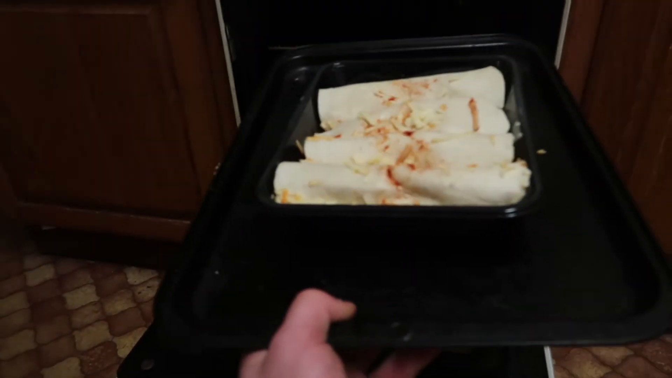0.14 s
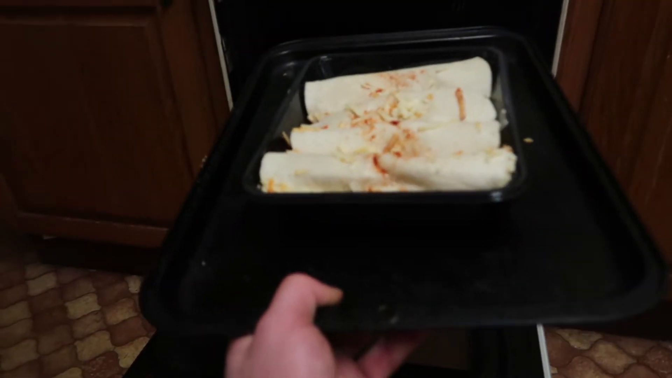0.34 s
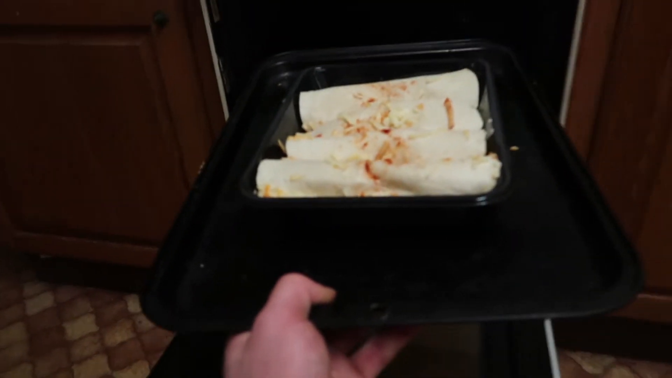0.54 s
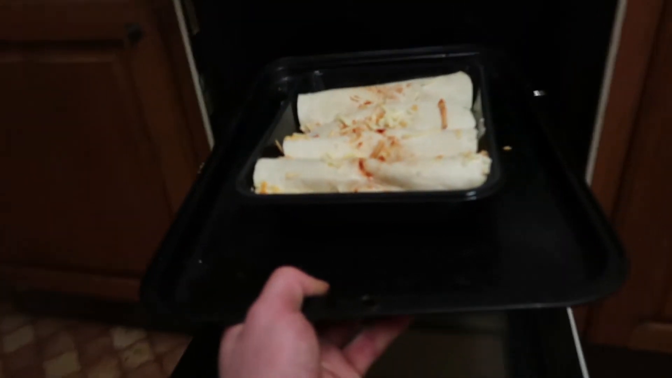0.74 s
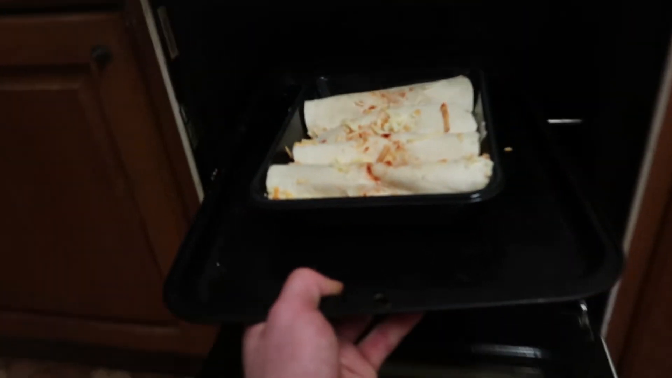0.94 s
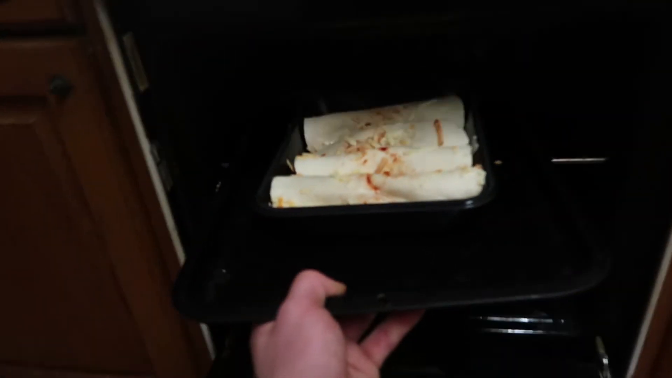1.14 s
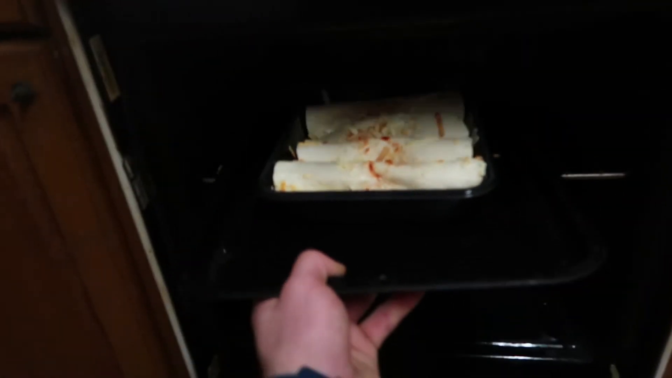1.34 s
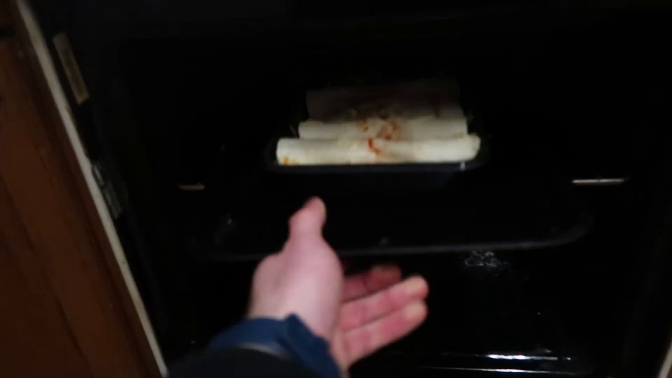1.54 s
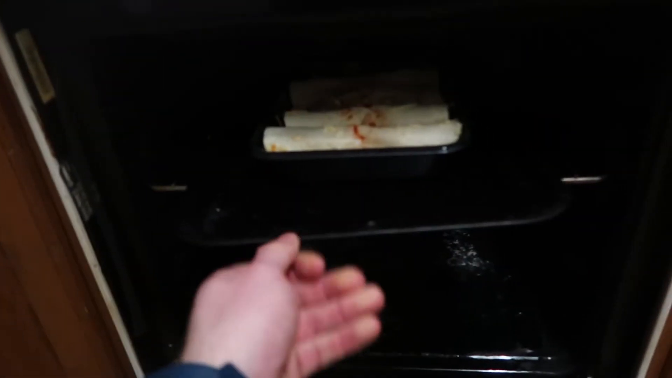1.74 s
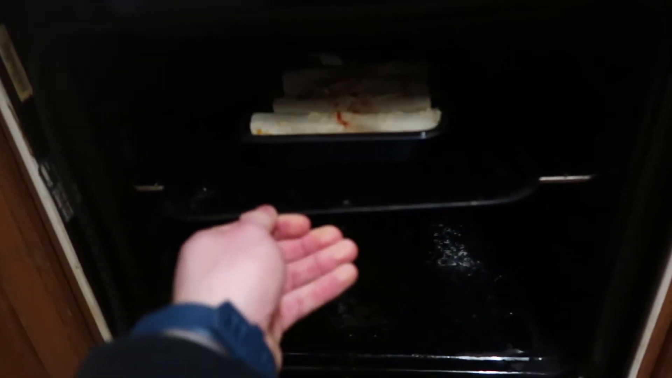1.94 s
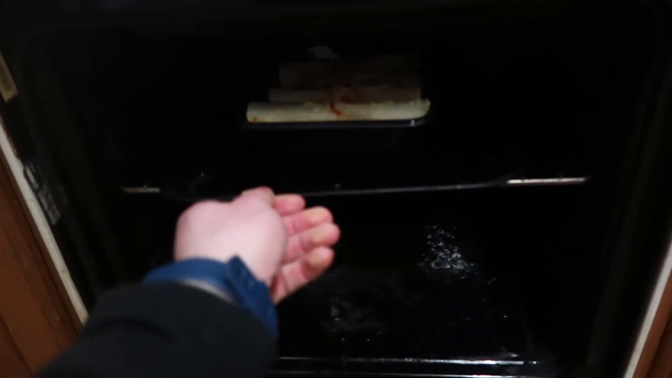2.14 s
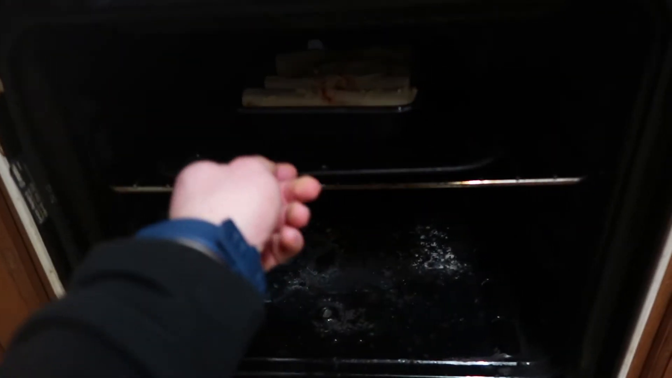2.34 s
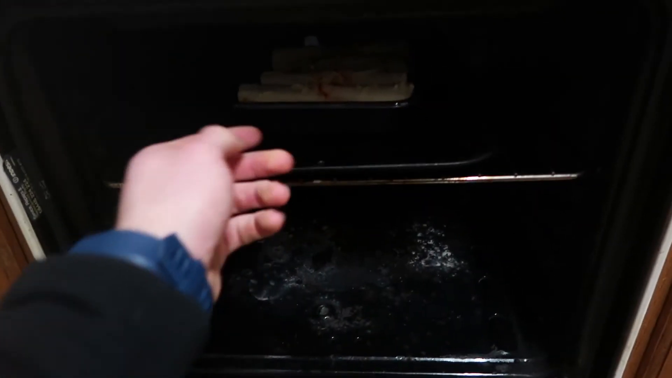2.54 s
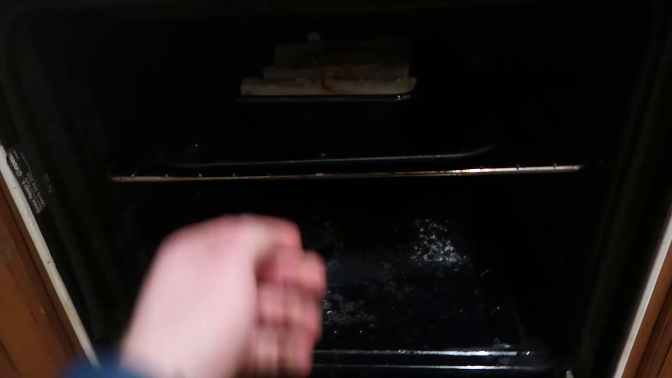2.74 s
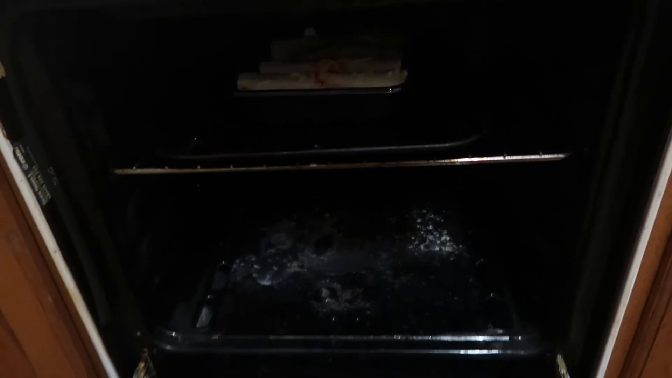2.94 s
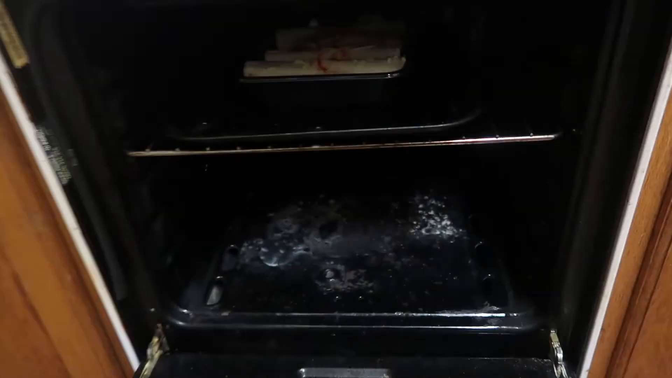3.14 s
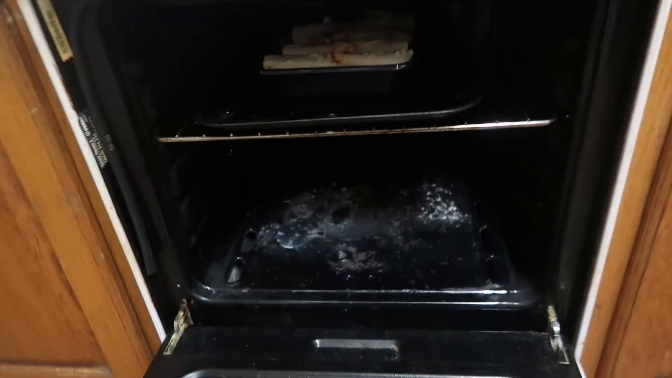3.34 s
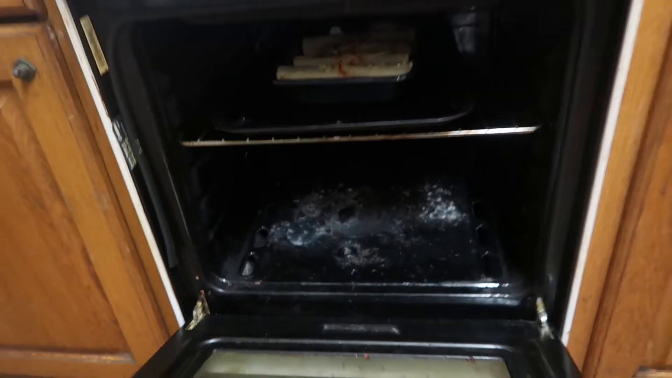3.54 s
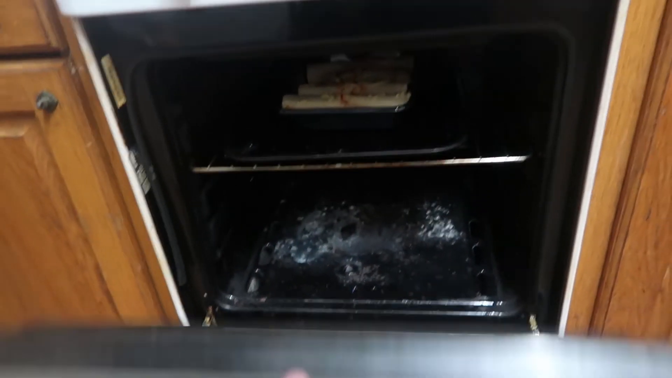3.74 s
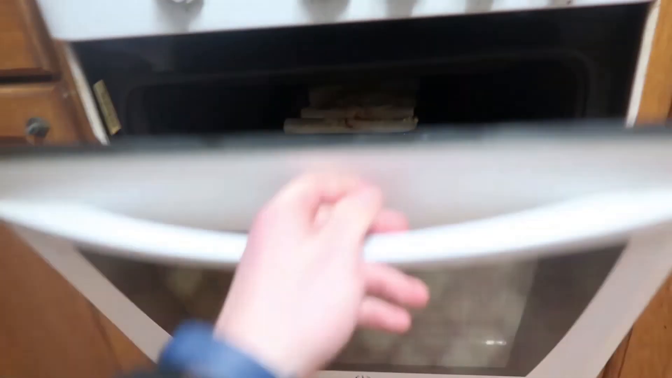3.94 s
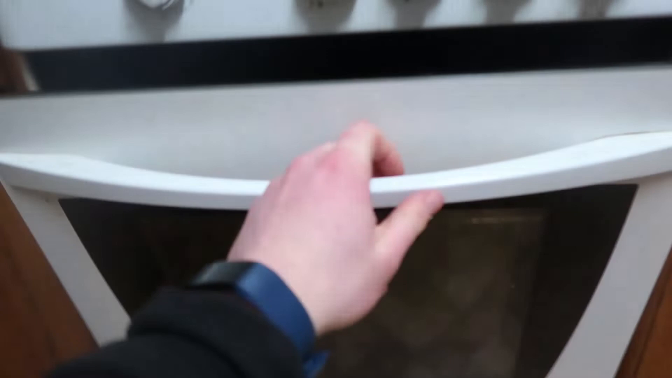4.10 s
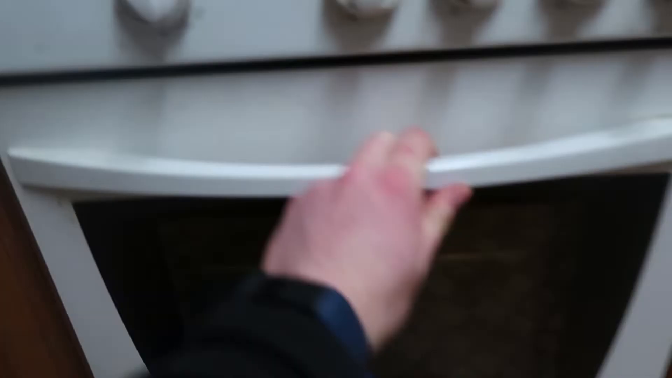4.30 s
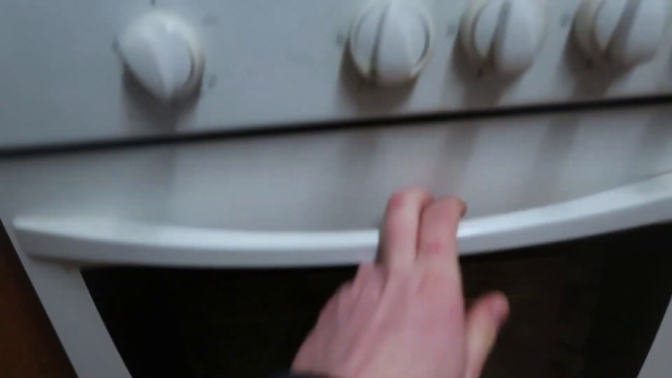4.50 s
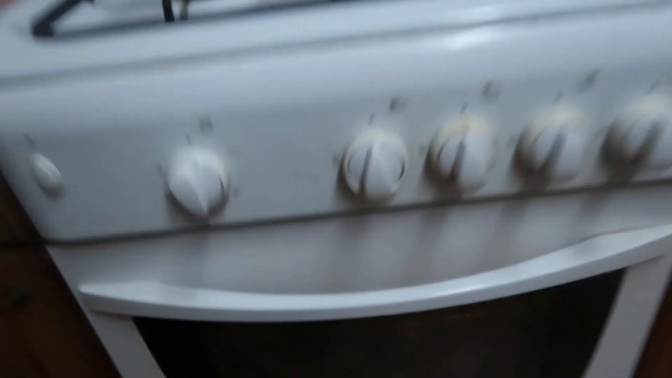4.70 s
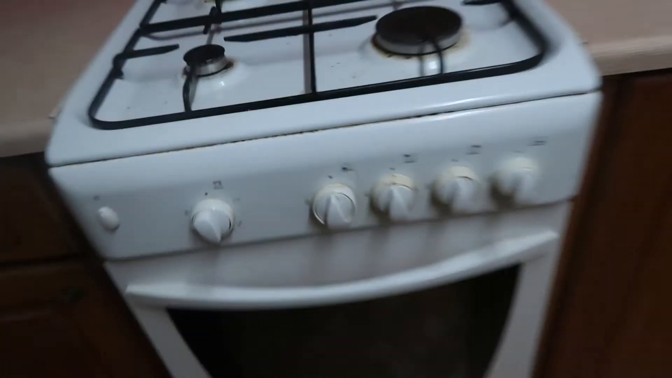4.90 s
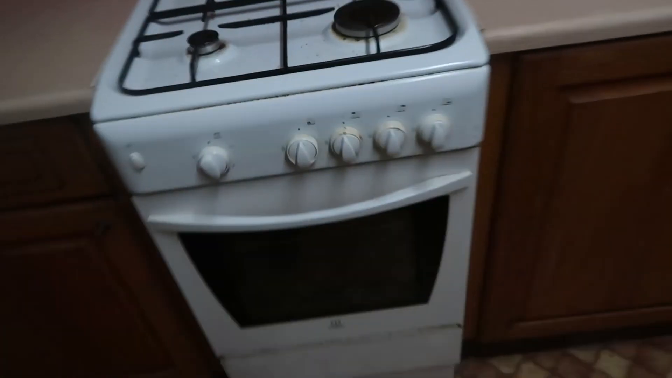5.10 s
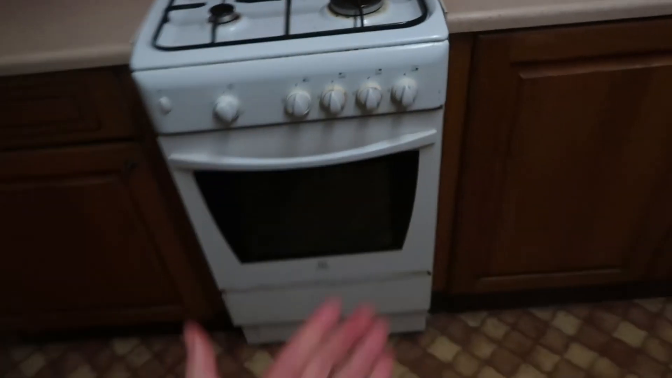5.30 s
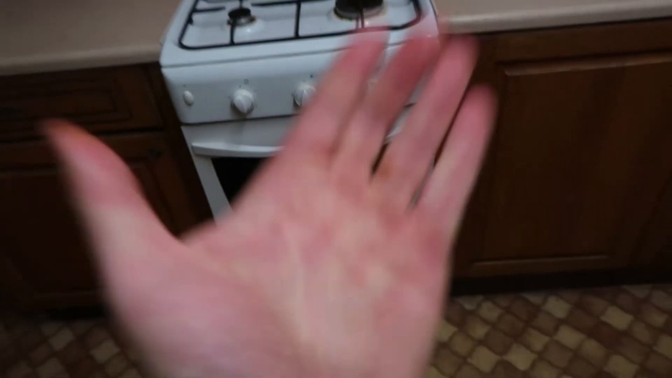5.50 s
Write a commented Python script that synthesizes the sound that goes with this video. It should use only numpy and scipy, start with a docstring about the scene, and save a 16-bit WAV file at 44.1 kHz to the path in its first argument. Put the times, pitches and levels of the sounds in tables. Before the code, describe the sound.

A metal baking tray knocks and scrapes into an oven in short shoves, then hinges squeal and the door slams with a rattling bang.

```python
"""A soft murmur and hiss swell up while a sleeve rustles, now and then, near the hand-held microphone.
A loaded steel baking tray knocks on an oven's wire shelf and is pushed home in scraping shoves; the shelf rings on.
The door is bumped and lifted on squealing hinges, and slams, rattling the cooker in a small kitchen.
Knocks and friction excite damped steel modes; squeals are sines on hinge resonances; the rest is shaped noise.
The background dips at the slam and recovers."""
import sys
import numpy as np
from scipy import signal
from scipy.fft import rfft, irfft
from scipy.io import wavfile

SR = 44100
rng = np.random.default_rng(int(sys.argv[2]) if len(sys.argv) > 2 else 0)


def master(y):
    """Save y as 16-bit WAV."""
    cut = np.clip(np.atleast_2d(y).T, -1, 1)
    pcm = np.round(cut * 32767)  # scale
    wavfile.write(sys.argv[1], SR, pcm.astype(np.int16))


N = 245151
TIME = np.arange(N) / SR
SLAM_S = 4.345
# shoves that slide the tray along the shelf:
# (start [s], length [s], relative grinding level [dB], relative grit level [dB])
SHOVES = [(1.354, 0.16, -36.5, -54), (1.473, 0.061, -29, -40), (1.563, 0.065, -41.5, -35),
          (1.618, 0.066, -28, -32.5), (1.868, 0.036, -34, -46.5), (1.917, 0.08, -33, -35),
          (2.068, 0.13, -36.5, -43), (2.247, 0.16, -35, -40.5)]


def from_db(db):
    """Decibels to gain."""
    return np.exp(np.asarray(db) * (np.log(10) / 20))


def rms_one(x):
    """Scale to unit power."""
    return x / np.sqrt(np.mean(x ** 2) + 1e-20)


def at_hz(points, hz):
    """Read a table along a log-frequency axis."""
    f, value = np.transpose(points)
    return np.interp(np.log(np.maximum(hz, 1)), np.log(f), value)


def drift(rate):
    """Random wander of unit power, through `rate` random points a second."""
    knots = rng.standard_normal(int(N / SR * rate) + 2)
    return rms_one(np.interp(TIME * rate, np.arange(len(knots)), knots))


def convolve(x, response):
    """Play x through an impulse response."""
    return signal.oaconvolve(x, response)[:len(x)]


def colour(x, spectrum, size=8192):
    """Causal (minimum-phase) filter with the given spectrum."""
    gain = from_db(at_hz(spectrum, np.fft.rfftfreq(size, 1 / SR)))
    cepstrum = irfft(np.log(gain))
    # fold the cepstrum forward in time
    cepstrum[1:size // 2] *= 2
    cepstrum[size // 2 + 1:] = 0
    return convolve(x, irfft(np.exp(rfft(cepstrum))))


def stroke(start_s, length_s, attack_s, release_s):
    """Envelope of one movement: attack, hold, release."""
    t = np.maximum(TIME - start_s, 0)
    attack = 1 - np.exp(-t / attack_s)
    release = np.exp(-np.minimum(np.maximum(t - length_s, 0) / release_s, 30))
    return attack * release


def strokes(rows, attack_s, release_s):
    """Joint envelope of several movements (start [s], length [s], level [dB]); their powers add."""
    power = sum((from_db(db) * stroke(s, length, attack_s, release_s)) ** 2 for s, length, db in rows)
    return np.sqrt(power)


def rub(centre_hz, octaves, size=32768):
    """Looped grainy noise around one pitch; unit power."""
    hz = np.linspace(1, SR / 2, size // 2 + 1)
    # cubing makes the noise spiky
    grains = rfft(rng.standard_normal(size) ** 3)
    band = np.exp(-.5 * (np.log2(hz / centre_hz) / octaves) ** 2)
    return np.resize(rms_one(irfft(grains * band)), N)


def dying(t, t60):
    """Decay by 60 dB in t60 seconds."""
    return np.exp(-np.log(1000) * t / t60)


def ringing(modes, t):
    """Damped sines of alternating sign."""
    return sum((-1) ** k * from_db(db) * dying(t, t60) * np.sin(2 * np.pi * hz * t)
               for k, (hz, db, t60) in enumerate(modes))


def partials(low_hz, high_hz, t60, length, count=90, size=12000):
    """The many thin overtones of steel, struck together; unit energy."""
    t = TIME[:size]
    hz = rng.uniform(low_hz, high_hz, (count, 1))
    phase = rng.uniform(0, 2 * np.pi, (count, 1))
    sines = np.sin((2 * np.pi * hz * t + phase).astype(np.float32))
    ring = sines.sum(axis=0) * dying(t, t60)
    return np.pad(ring / np.linalg.norm(ring), (0, length - size))


def scatter(decay_s, length, size=2048, count=4):
    """A short burst of reflections with a nearly even spectrum and unit energy."""
    fade = np.exp(-TIME[:size] / decay_s)
    burst = rng.standard_normal(size) * fade
    # flatten the spectrum, then hold the tail down again
    for _ in range(count):
        flat = irfft(np.exp(1j * np.angle(rfft(burst))))
        burst = flat * np.minimum(1, 10 * fade)
    return np.pad(burst / np.linalg.norm(burst), (0, length - size))


def steel_body(modes, spectrum, ring, crack_db, crack_s, wash_db, modes_db, sheen_db, count=12):
    """Response to one tap: a crack, a wash of dense panel and room modes, thin overtones and a few clear modes."""
    # lean of the crack, wash and overtones against the clear modes: (frequency [Hz], gain [dB])
    wash_tilt = [(40, 4), (100, -0.5), (220, 5), (470, -4.5), (750, 0.5), (1400, 1), (3000, 2)]
    t = TIME[:SR]
    crack = scatter(crack_s, len(t)) * np.sqrt(crack_s * SR / 2)

    # each band of the wash dies at its own rate
    edges = np.geomspace(30, 16000, count + 1)
    white, wash = rng.standard_normal((2, len(t))), 0
    for k, (low, high) in enumerate(zip(edges, edges[1:])):
        band_pass = signal.butter(2, [low, high], "band", fs=SR, output="sos")
        band = signal.sosfilt(band_pass, white[k % 2])
        wash = wash + band * dying(t, at_hz(ring, np.sqrt(low * high)))

    sheen = partials(1000, 13000, 0.23, len(t))
    dense = from_db(crack_db) * crack + from_db(wash_db) * wash + from_db(sheen_db) * sheen
    spectrum_norm = np.linalg.norm(colour(signal.unit_impulse(len(t)), spectrum))
    dense = colour(colour(dense, spectrum), wash_tilt) / spectrum_norm

    # keep the deep bass out of the clear modes
    bass_cut = signal.butter(2, 95, "high", fs=SR, output="sos")
    clear = signal.sosfilt(bass_cut, ringing(modes, t))
    return dense + from_db(modes_db) * clear


def knocks(rows, size=512):
    """Force pulses; a softer contact is a duller pulse."""
    force = np.zeros(N)
    for s, db, bright_hz in rows:
        soften = signal.butter(2, min(bright_hz, SR / 2 - 1000), fs=SR, output="sos")
        at = round(s * SR)
        force[at:at + size] += from_db(db) * signal.sosfilt(soften, signal.unit_impulse(size))
    return force


def friction(per_s, spread_db, judder_db):
    """Tiny slips of uneven size and random sign, juddering in strength; unit power."""
    chance, size, sign = rng.random((3, N), dtype=np.float32)
    at, slips = np.flatnonzero(chance < per_s / SR), np.zeros(N)
    uneven = np.minimum(-np.log1p(-size[at]), 4)
    slip_db = spread_db * uneven + judder_db * drift(130)[at]
    slips[at] = np.sign(sign[at] - .5) * from_db(slip_db)
    return rms_one(slips)


def background(murmur_dip_share=0.73):
    """A low murmur and a soft hiss swell together, dip at the slam and recover."""
    # spectra of the two noises: (frequency [Hz], relative density [dB per Hz])
    murmur_colour = [(18, -36), (30, -20), (102, -9), (188, -9.5), (221, -4.5), (333, -4), (439, -1),
                     (526, -2), (673, -3), (918, -9), (1190, -4.5), (1500, -18), (1950, -22), (3300, -120)]
    hiss_colour = [(760, -33.5), (1300, -4), (1600, -4.5), (2490, -3.5), (3040, -9.5), (3870, -8),
                   (4540, -11), (9050, -18.5), (13500, -17.5), (14200, -14.5)]
    murmur_db, hiss_db = -51, -56.5
    swell_depth_db, swell_s, murmur_swell_share = 20.5, 1.8, .85
    dip_depth_db, recover_db_per_s = 9, 7.5

    swell_db = -swell_depth_db * np.maximum(1 - TIME / swell_s, 0)
    dip_db = (TIME > SLAM_S) * np.maximum(dip_depth_db - recover_db_per_s * (TIME - SLAM_S), 0)
    murmur_level = from_db(murmur_db + murmur_swell_share * swell_db - murmur_dip_share * dip_db)
    murmur = murmur_level * rms_one(colour(rng.standard_normal(N), murmur_colour))
    hiss_level = from_db(hiss_db + swell_db - dip_db)
    hiss = hiss_level * rms_one(colour(rng.standard_normal(N), hiss_colour))
    return murmur + hiss


def handling():
    """The sleeve rubs, as grainy noise, with each movement of the arm; the hand ticks and bumps."""
    # sleeve rubs: (start [s], length [s], level [dB], centre [Hz])
    rustles = [(0.238, .03, -66, 1380), (0.392, 0.1, -58, 1150), (0.455, 0.031, -48.5, 1410),
               (0.653, .03, -62.5, 1880), (3.16, 0.34, -52.5, 1500), (3.45, 0.022, -47, 1270),
               (3.594, 0.44, -46.5, 1180), (4.144, 0.28, -46, 1540), (4.821, 0.093, -54, 1570),
               (5.07, 0.025, -46.5, 2750), (5.268, .3, -52, 1260)]
    # small ticks and bumps of the hand: (start [s], level [dB], centre [Hz], width [octaves], fall [s])
    touches = [(.7, -61, 36.3, 0.68, 0.043), (3.34, -36.5, 2080, 0.31, 0.024),
               (3.34, -46.5, 5270, 0.41, 0.018), (5.072, -51, 3000, 0.89, 0.014),
               (5.125, -55, 30, 1.2, 0.12), (5.135, -41.5, 207, 0.49, 0.027),
               (5.246, -44.5, 950, 0.53, .02)]
    rustle_octaves, rustle_attack_s, rustle_release_s = 1.025, 0.011, 0.054
    touch_rise_s = 0.0018

    sleeve = sum(from_db(db) * stroke(s, length, rustle_attack_s, rustle_release_s) * rub(hz, rustle_octaves)
                 for s, length, db, hz in rustles)
    hand = sum(from_db(db) * stroke(s, touch_rise_s, touch_rise_s, fall_s) * rub(hz, octaves)
               for s, db, hz, octaves, fall_s in touches)
    return sleeve + hand


def tray(overtones_db=1):
    """Knocks and sliding friction ring the same tray; grit hisses in the wires' overtones."""
    # knocks on the shelf: (time [s], strength [dB], contact brightness [Hz])
    tray_knocks = [(1.2638, -13.5, 9900), (1.328, -18.5, 11900), (1.336, -24, 14000), (1.646, -26.5, 9000),
                   (1.667, -16, 4960), (1.979, -25, 5900), (2.008, -32, 3000), (2.346, -20, 1850),
                   (2.416, -33, 1970)]
    # clear modes of the tray: (frequency [Hz], relative level [dB], t60 [s])
    tray_modes = [(111, -43, 0.55), (182, -22.5, .3), (221.5, -18.5, 0.73), (272, -17, 0.7),
                  (342, -18.5, 0.21), (400.5, -13, 0.23), (430, -14.5, 0.9), (467, -22, 0.66),
                  (612.6, -6.5, 0.19), (681, -11, 0.32), (698, -15, 0.26), (752, -18.5, 0.59),
                  (824, -15, 0.32), (1130, -21, 0.21), (1185, -19, 0.19), (1205, -20, 0.34),
                  (1604, -20, 0.41), (2145, -15, 0.042), (2320, -20, 0.18), (2950, -20, 0.26)]
    # spectra of tray and grit: (frequency [Hz], relative density [dB per Hz])
    tray_colour = [(35, -54), (60, -50), (101, -16), (146, -30), (215, -9), (364, -8.5), (437, 3),
                   (536, -6), (615, -9), (886, -7), (1090, -6.5), (3040, -14), (11100, -32.5), (14000, -37)]
    grit_colour = [(1760, -40), (3000, 1.5), (3350, -5), (4450, -2.5), (5220, -7), (11100, -17),
                   (14000, -25)]
    # decay of the tray's wash: (frequency [Hz], t60 [s])
    tray_ring = [(100, 1), (500, 0.36), (2000, 0.38), (6000, 0.37), (13000, 0.25)]
    # lean of the dry scrape against the clear modes: (frequency [Hz], gain [dB])
    grind_tilt = [(60, -15), (110, -4), (230, -7), (450, 0.5), (1000, 1), (4000, 0.5), (12000, -1)]
    attack_s, grind_release_s, grit_release_s = 0.011, 0.051, 0.049

    body = steel_body(tray_modes, tray_colour, tray_ring, crack_db=-8.0, crack_s=0.0086,
                      wash_db=-13.0, modes_db=-7, sheen_db=7.0)
    grinding = strokes([(s, length, db) for s, length, db, _ in SHOVES], attack_s, grind_release_s)
    gritting = strokes([(s, length, db) for s, length, _, db in SHOVES], attack_s, grit_release_s)

    slips = colour(grinding * friction(per_s=700, spread_db=2.0, judder_db=3.0), grind_tilt)
    grind = convolve(slips, body / np.linalg.norm(body))

    specks = friction(per_s=3000, spread_db=2.5, judder_db=1.5)
    wires = partials(1500, 13500, 0.14, SR, count=110)
    specks = specks + from_db(overtones_db) * convolve(specks, wires)
    grit = gritting * rms_one(colour(specks, grit_colour))
    return convolve(knocks(tray_knocks), body) + from_db(-2) * grind + from_db(-4.5) * grit


def cavity(follow_db=-13, boom_db=-30, thud_db=-42, attack_s=.02, release_s=0.12):
    """The hollow oven rumbles along with each shove and booms as the door meets its stop and slams."""
    # rumble spectrum: (frequency [Hz], relative density [dB per Hz])
    cavity_colour = [(30, -36), (65, -19), (115, 1), (165, -4.5), (240, 1.5), (330, -4.5), (480, -2.5),
                     (770, -2.5), (1200, -7), (2500, -40)]
    thud_s = 4.09   # the door meets its hinge stop
    blows = [(s, length, db + follow_db) for s, length, db, _ in SHOVES]
    blows += [(thud_s, attack_s, thud_db), (SLAM_S, attack_s, boom_db)]
    rumble = rms_one(colour(rng.standard_normal(N), cavity_colour))
    return strokes(blows, attack_s, release_s) * rumble


def shelf(release_s=2.36, build_s=0.034):
    """The loaded wire shelf's ring builds as the hand's grip eases, then dies away."""
    # modes of the shelf: (frequency [Hz], level [dB], t60 [s])
    shelf_modes = [(221, -43.5, 3.3), (442, -42, 1.55), (632, -56.5, 7.5), (720, -53, 0.82),
                   (1200, -56, 1.3), (1670, -48, 1.1)]
    t = TIME[:2 * SR]
    ring = (1 - np.exp(-t / build_s)) * ringing(shelf_modes, t)
    return np.interp(TIME - release_s, t, ring, left=0, right=0)


def door():
    """Bumps ring the hollow panel, blows the casing; shelves, pan supports and hinge arms chatter as loose parts."""
    # the lowered door is bumped and taken up; then door, hinge stops and latch knock:
    # (time [s], strength [dB], contact brightness [Hz])
    lift_bumps = [(3.2645, -21, 790), (3.2715, -16.5, 930), (3.303, -28.5, 503), (3.4105, -22, 564),
                  (3.424, -24, 606)]
    door_knocks = [(3.611, -30.5, 2800), (4.0795, -22, 3500), (4.085, -24, 2000), (4.094, -15.5, 1000),
                   (4.113, -21.5, 1700), (4.121, -30, 1100), (4.304, -23.5, 1710), (4.309, -13, 770),
                   (4.345, -1, 3820), (4.347, 3.5, 1200), (4.3498, -17, 7040), (4.367, -15, 3000),
                   (4.3815, -21, 6050), (4.389, -8.5, 2500), (4.455, -19.5, 5000), (4.57, -34.5, 7000)]
    # clear modes of the hollow panel, then of cooker casing and door: (frequency [Hz], relative level [dB], t60 [s])
    panel_modes = [(116, -23.5, 0.45), (190, -20.5, 0.44), (285, -18, 0.11), (346.4, -4.5, 0.29),
                   (413, -8, 0.1), (450, -12, 0.14), (600, 2.5, 0.032), (645, -4.5, 0.12),
                   (970, -18.5, 0.28)]
    casing_modes = [(117, -28.5, 0.81), (161.4, -35, 1.27), (234, -31, 2.35), (273, -9.5, 0.19),
                    (301, -7, 0.29), (323, -26, 1.4), (348, -9.5, 0.25), (374, -14.5, 0.33),
                    (391.6, -17, 0.26), (431, -11, 0.12), (543, -31, 0.33), (603, -8, 0.26),
                    (636, -7.5, 0.26), (685, -13, 0.34), (766, -9, 0.27), (828, -16.5, .22),
                    (976, -25, 0.18), (1102, -15, 0.32), (1202, -20, 0.22), (1485, -17, 0.14),
                    (1634, -22, 0.31), (1900, -20, 0.24), (1812, -24, 0.22), (2460, -22, 0.17),
                    (2994, -27, 0.081)]
    # their spectra: (frequency [Hz], relative density [dB per Hz])
    panel_colour = [(40, -38.5), (110, -11), (160, -26), (350, -1.5), (620, 3), (800, -8.5), (2200, -10.5),
                    (5000, -3.5), (14000, -19)]
    casing_colour = [(18, -54), (30, -40), (109, -11), (144, -12.5), (281, -7.5), (336, -2), (548, -1.5),
                     (608, -3.5), (674, -17), (766, -1), (941, -10.5), (1250, -7), (4070, -18), (7950, -21),
                     (14000, -35)]
    # decay of the wash in both: (frequency [Hz], t60 [s])
    door_ring = [(60, 0.93), (200, 0.55), (700, 0.57), (2500, 0.51), (6000, 0.56), (13000, 0.26)]
    # loose parts chatter after a blow: (start [s], length [s], relative level [dB])
    chatters = [(4.09, 0.024, -65), (4.35, 0.039, -48), (4.44, 0.022, -49.5)]
    chatter_attack_s, chatter_release_s = 0.0056, 0.043

    panel = steel_body(panel_modes, panel_colour, door_ring, crack_db=-3.5, crack_s=0.0068,
                       wash_db=-9.5, modes_db=-6, sheen_db=6)
    casing = steel_body(casing_modes, casing_colour, door_ring, crack_db=-1.5, crack_s=0.0041,
                        wash_db=-19, modes_db=-9.5, sheen_db=5.0)
    rattle = friction(per_s=600, spread_db=2, judder_db=3)
    chatter = strokes(chatters, chatter_attack_s, chatter_release_s) * rattle
    chatter = colour(chatter, [(200, -10), (900, 3.5), (3000, 9.5), (10000, -7)])   # (Hz, dB)
    return convolve(knocks(lift_bumps), panel) + convolve(knocks(door_knocks) + chatter, casing)


def hinge(rasp_octave_db=-9, unevenness=0.0598, tone_db=-1, scuff_db=2, room_db=-11):
    """Dry stick-slip rises in pitch as the door swings, then falls at its stop; squeals join it."""
    # friction while the door swings: (time [s], relative level [dB])
    rasp = [(3.62, -65), (3.692, -57), (3.706, -52), (3.768, -54), (3.788, -42), (3.816, -47.5),
            (3.918, -50.5), (4.148, -62), (4.27, -67)]
    # scuff spectrum: (frequency [Hz], relative density [dB per Hz])
    hinge_colour = [(1500, -26), (3500, -11), (4800, 6.5), (6200, -2.5), (7700, -7), (9000, -16),
                    (10800, -5), (12600, -10.5), (14000, -18)]
    swing_s, slip_at_swing_hz, slip_rise_hz_per_s = 3.7, 5040, 5500
    stop_s, slip_fall_hz_per_s = 4.04, 17000   # the door slows at its stop

    rasp_db = np.interp(TIME, *np.transpose(rasp))
    swinging = (TIME > rasp[0][0]) & (TIME < rasp[-1][0])
    slip_hz = slip_at_swing_hz + slip_rise_hz_per_s * (np.minimum(TIME, stop_s) - swing_s)
    slip_hz = slip_hz - slip_fall_hz_per_s * np.maximum(TIME - stop_s, 0)
    phase = 2 * np.pi * np.cumsum(slip_hz * (1 + unevenness * drift(900))) / SR
    tone = np.sin(phase) + from_db(rasp_octave_db) * np.sin(2 * phase)

    # loose slips set the hinge arm's overtones ringing
    loose_slips = friction(per_s=2200, spread_db=7.0, judder_db=3.0)
    scuff = convolve(loose_slips, partials(3500, 13300, 0.12, SR, count=36))
    scuff = rms_one(colour(scuff, hinge_colour))
    dry_rasp = swinging * from_db(rasp_db) * (from_db(tone_db) * tone + from_db(scuff_db) * scuff)
    out = dry_rasp + squeals()
    # the small kitchen throws the squeal back
    return out + from_db(room_db) * convolve(out, scatter(0.03, SR))


def squeals(waver_hz=18, octave_db=-15, flutter_db=2.0):
    """Each squeal creeps up in pitch and sounds the steel resonances that it passes."""
    # squeals: (loudest time [s], pitch then [Hz], relative level [dB], swell [s], fade [s])
    squeal_rows = [(3.64, 3840, -51, 0.019, .03), (3.745, 5410, -45.5, 0.022, .1),
                   (3.76, 4800, -50, .043, 0.081), (3.795, 4089, -50, .011, .018),
                   (3.8, 7130, -50, .008, 0.014), (3.86, 5300, -40, .02, 0.035),
                   (3.895, 6600, -40, .03, .03), (3.917, 6110, -34, 0.035, 0.021),
                   (3.94, 7830, -52, .022, .02), (3.94, 2685, -49, 0.019, .02),
                   (3.97, 6270, -43.5, 0.018, 0.03), (4.035, 5690, -51, 0.016, .025),
                   (4.04, 6730, -48, .03, 0.04)]
    # steel resonances of the hinges: (frequency [Hz], relative level [dB])
    hinge_modes = [(2685, 1), (3840, 0), (4089, 3.5), (4830, 3), (5056, 16), (5330, -4), (5430, 2.5),
                   (5690, 3.5), (6130, 1), (6268, 0.5), (6645, 1), (6730, 0), (7100, -4), (7830, 1)]
    rise_hz_per_s, lock_hz = 770, 55   # lock_hz: how near a pitch must come to sound a resonance

    near = slice(round(3.4 * SR), round(4.5 * SR))
    t, out = TIME[near], np.zeros(N)
    pitches = [hz + rise_hz_per_s * (t - s) for s, hz, *_ in squeal_rows]
    levels = []
    for s, _, db, swell_s, fade_s in squeal_rows:
        swell = np.exp(-.5 * ((t - s) / swell_s) ** 2)
        fade = np.exp(-np.abs(t - s) / fade_s)
        levels.append(from_db(db) * np.where(t < s, swell, fade))

    for hz, db in hinge_modes:
        drive = sum(level * np.exp(-.5 * ((pitch - hz) / lock_hz) ** 2)
                    for pitch, level in zip(pitches, levels))
        phase = 2 * np.pi * np.cumsum(hz + waver_hz * drift(200)[near]) / SR
        tone = np.sin(phase) + from_db(octave_db) * np.sin(2 * phase)
        flutter = from_db(db + flutter_db * drift(70)[near])
        out[near] += np.sqrt(2) * flutter * drive * tone
    return out


def spread(mid, size=4096):
    """Near reflections reach the two ports differently: the bass is central, the treble wide."""
    # side against mid: (frequency [Hz], gain [dB])
    width = [(600, -82), (1200, -47), (2360, -14), (4350, -6), (8000, 0), (12000, 5.5)]
    side = colour(convolve(mid, scatter(0.01, size, size=size)), width)
    return np.array([mid + side, mid - side])


def scene():
    """Everything happens straight in front of the microphone."""
    return spread(background() + handling() + tray() + cavity() + shelf() + door() + hinge())


def record(dry):
    """Peaks such as the slam overload the input softly; the top of the band is cut."""
    ceiling, cutoff_hz = 1.08, 14100
    clipped = dry / (1 + (dry / ceiling) ** 4) ** .25
    low_pass = signal.cheby1(12, .2, cutoff_hz, fs=SR, output="sos")
    return signal.sosfilt(low_pass, clipped)


dry = scene()
out = record(dry)
master(out)
```